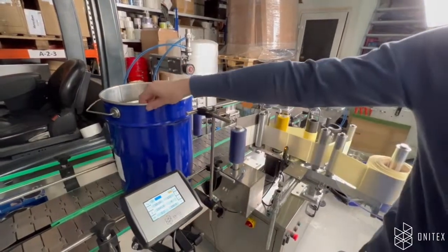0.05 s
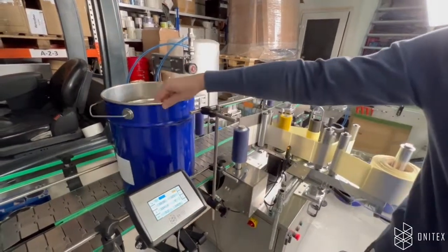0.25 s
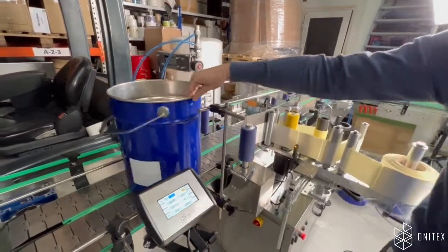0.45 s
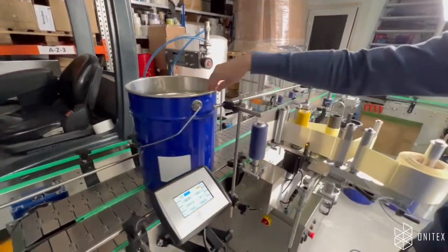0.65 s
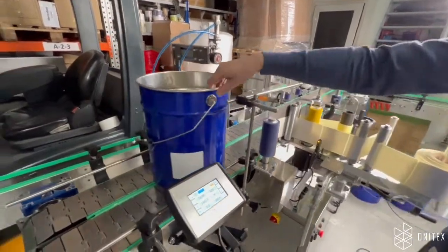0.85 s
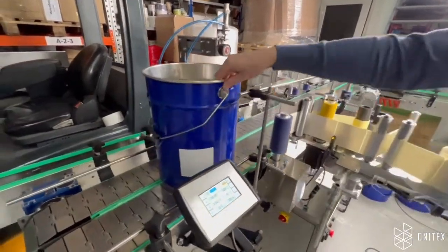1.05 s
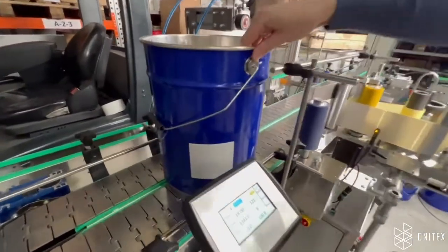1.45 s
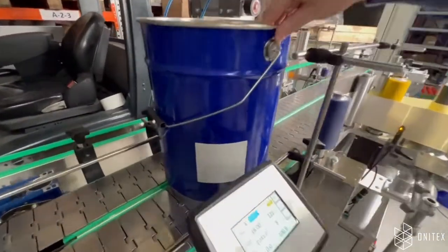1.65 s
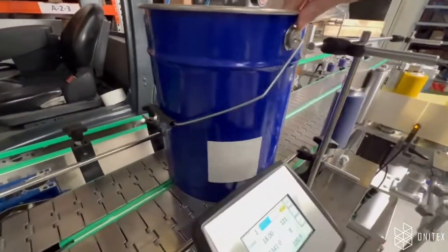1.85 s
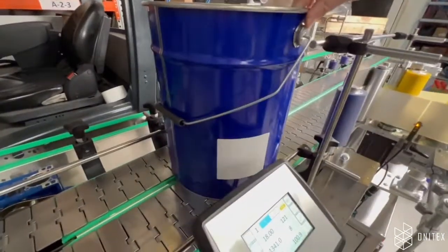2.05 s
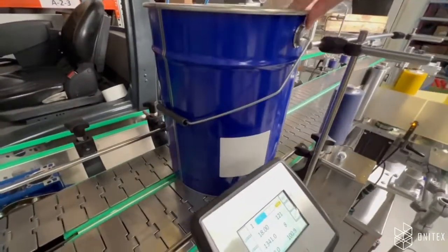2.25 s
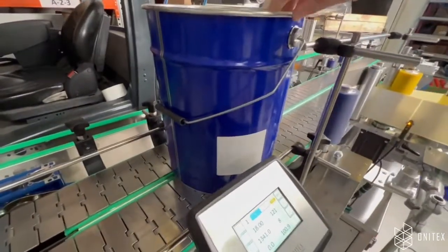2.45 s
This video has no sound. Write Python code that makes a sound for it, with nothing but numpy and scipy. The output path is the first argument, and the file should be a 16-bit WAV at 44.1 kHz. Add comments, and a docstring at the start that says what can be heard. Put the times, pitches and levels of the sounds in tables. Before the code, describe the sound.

An empty steel bucket is turned on a conveyor: its wire handle clicks, then the thin shell clangs and rattles as the base thumps down. Soft scraping and a few handle clicks follow, over a motor hum in a reverberant workshop.

```python
"""A reverberant workshop: an empty steel bucket is turned and set on a labelling machine's conveyor.
Its wire handle clicks in the lugs and drops against the wall, the base thumps down, and the thin
shell clangs and chatters. Each part is a set of decaying modes driven by impulses. Friction noise
scuffs softly as the bucket slides; a motor hums behind it."""
import sys
import numpy as np
from scipy import signal
from scipy.fft import rfft, irfft
from scipy.io import wavfile
from scipy.ndimage import uniform_filter1d

SR = 44100
rng = np.random.default_rng(int(sys.argv[2]) if len(sys.argv) > 2 else 0)


def to_wav(sig):
    """Store sig (one row per channel, or 1-D mono) as 16-bit WAV at the path in sys.argv[1].

    Samples outside -1..1 are clipped; the rate is SR.
    """
    pcm = np.clip(np.atleast_2d(sig), -1, 1) * 32767
    pcm = np.round(pcm).astype(np.int16)
    wavfile.write(sys.argv[1], SR, pcm.T)  # frames by channels


N = 110250
TIME_S = np.arange(N) / SR
FREQ_HZ = np.maximum(np.arange(N // 2 + 1) * SR / N, 1)

# wall ringing: pitch_hz, level_db, t60_s
WALL_MODES = [(209, -10, 1), (240.9, -10.5, 0.6), (763.6, -12.5, 0.44), (893, -9.5, 0.24),
              (1215, -11.5, 0.6), (1351, -6.5, 0.31), (1468, -10.5, 0.56), (1785, -13, 0.45),
              (1779, -1, 0.13), (2156, -8.5, 0.39), (4740, -7, 0.07), (3064, -7.5, 0.18),
              (3438, -9.5, 0.16), (4090, -18.5, 0.25)]
# dense shell modes: freq_hz, density_db
SHELL_SPECTRUM = [(100, -39), (230, 8), (560, -4), (850, 0.5), (1080, -7), (1400, -0.5), (2300, 0.5),
                  (3800, -5.5), (6000, -8), (9500, -10.5), (15000, -27)]
# blows on the shell: start_s, level_db, lowpass_hz, highpass_hz
SHELL_BLOWS = [(.5133, -27, 6100, 130), (.535, -35, 2920, 150), (.6285, -32, 10900, 1470),
               (.631, -21, 5170, 1680), (.638, -28.5, 4130, 477), (.661, -30.5, 1790, 583),
               (.684, -30, 4500, 597), (.745, -32, 3180, 675), (1.153, -44.5, 3100, 1280),
               (2.211, -43.5, 1780, 1300)]
# rim and handle chatter: time_s, level_db
CHATTER_ENVELOPE = [(.52, -31.5), (.56, -41), (.61, -46), (.65, -40), (.74, -39.5), (.79, -50.5),
                    (.86, -68)]
# wire and lug ringing: pitch_hz, level_db, t60_s
HANDLE_MODES = [(3235, -2, 0.12), (4790, -7.5, 0.071), (6290, -4, 0.12), (8511, -5.5, 0.095),
                (12900, -13, .05)]
# handle contact noise: freq_hz, density_db
LUG_SPECTRUM = [(300, -18), (900, 6), (2500, -3), (4500, -4), (7000, 1.5), (10000, -3.5), (13500, -5),
                (16000, -19)]
# handle clicks: start_s, level_db, lowpass_hz, highpass_hz, wire_ring_db
HANDLE_CLICKS = [(0.34, -27.5, 17000, 3470, -20), (0.345, -28.5, 9500, 700, -14),
                 (.352, -36, 12300, 700, -20), (0.463, -33, 9100, 5550, -17),
                 (0.5135, -30, 12400, 1500, -29), (0.626, -30, 19100, 10800, -7),
                 (1.149, -48.5, 18000, 2600, -20), (2.1197, -36, 9200, 1530, -5),
                 (2.127, -43, 8100, 600, 1)]
# base ringing: pitch_hz, level_db, t60_s
BASE_MODES = [(77, -9, 0.42), (119.3, 4, 0.14), (136.5, -8, 0.49), (203, -2, 0.49)]
# base meets conveyor: start_s, level_db
BASE_THUMPS = [(.52, -35), (0.601, -29), (.66, -32.5), (.715, -36.5)]
# hollow rolled rim: pitch_hz, level_db, t60_s
RIM_MODES = [(874, -1.5, 0.12), (1313, 2.5, 0.083), (1454, -4, 0.091), (4015, -3, 0.055)]
# knocks on the rim: start_s, level_db
RIM_KNOCKS = [(.3435, -29.5), (0.383, -37.5), (2.213, -49.5)]
# rubbed resonances: centre_hz, width_hz, level_db
RUB_RESONANCES = [(211.3, 22, 2.5), (1375, 250, 2.5)]
# rubbing during the turn: time_s, level_db
RUB_ENVELOPE = [(0, -85), (.21, -60), (.28, -46.5), (.33, -47.5), (.5, -55.5)]
# sliding hiss: freq_hz, density_db
SLIDE_SPECTRUM = [(300, -27.5), (900, 16.5), (1100, 0.5), (2200, 7.5), (4000, -1), (6300, 0.5),
                  (9500, -4.5), (14000, -13.5)]
# sliding hiss: time_s, level_db
SLIDE_ENVELOPE = [(0, -68.5), (.12, -51.5), (.29, -44.5), (.62, -39), (.85, -66.5), (1.6, -69.5),
                  (1.75, -57.5), (1.87, -50), (2.03, -58.5), (2.19, -50), (2.3, -101)]
# base scraping: freq_hz, density_db
SCRAPE_SPECTRUM = [(700, -28), (1750, -2), (4000, -42)]
# base scraping: time_s, level_db
SCRAPE_ENVELOPE = [(.9, -55), (1.22, -52), (1.65, -61.5)]
# bucket stereo width: freq_hz, side_to_mid_db
METAL_WIDTH = [(120, -22), (350, -0.5), (1300, 3.5), (4000, -2), (9000, 1), (13000, -5.5)]
# motor shaft harmonics 1-5: rms_db
MOTOR_HARMONICS_DB = [-89, -49, -51, -56, -74]
# machine tones: pitch_hz, rms_db
MACHINE_TONES = [(208, -57.5), (410, -60.5), (694, -64)]
# air and machinery noise: freq_hz, density_db
SHOP_SPECTRUM = [(22, -37), (38, 1), (70, 0.5), (130, -0.5), (230, -7), (850, -15.5), (1900, -21),
                 (2800, -29.5), (4200, -37.5), (6500, -37.5), (9500, -50), (15000, -69)]
# workshop stereo width: freq_hz, side_to_mid_db
SHOP_WIDTH = [(40, -7.5), (140, -9), (300, -1.5), (1000, 1)]
# microphone port dips: centre_hz, half_width_hz, gain_db
PORT_NOTCHES = [(5440, 79, -7.5), (7650, 217, -20.5), (10920, 697, -23.5)]


def shell():
    """Blows and quick rebounds ring the thin steel shell."""
    crack_db, crack_s, wall_db = 4.5, 0.01, -0.5
    rebounds_per_s, scatter_db = 140, -0.5
    body = decay(mode_cloud(SHELL_SPECTRUM, spacing_hz=8), t60_s=0.44, damping=0.083)
    body += undb(crack_db) * noise(SHELL_SPECTRUM, METAL_WIDTH) * np.exp(-TIME_S / crack_s)
    body += undb(wall_db) * ring(WALL_MODES)
    hits = rng.random(N) < rebounds_per_s / SR
    rebounds = hits * undb(scatter_db * rng.standard_normal(N)) * envelope(CHATTER_ENVELOPE)
    force = strikes(SHELL_BLOWS) + contact(rebounds, lowpass_hz=3800, highpass_hz=550)
    return drive(force, body)


def handle():
    """The wire handle clicks in its lugs and pings when it hangs free."""
    lugs = decay(mode_cloud(LUG_SPECTRUM, spacing_hz=54.74), t60_s=0.16, damping=0.027)
    clicks = strikes(row[:4] for row in HANDLE_CLICKS)
    pings = sum(tap(s, db + ring_db) for s, db, _, _, ring_db in HANDLE_CLICKS)
    return drive(clicks, lugs) + drive(pings, ring(HANDLE_MODES))


def base():
    """The flat base booms as it rocks onto the conveyor."""
    thumps = sum(tap(s, db) for s, db in BASE_THUMPS)
    return drive(thumps, ring(BASE_MODES, spread=0) * onset(rise_s=0.0022))


def rim():
    """Knocks ring the rim; rubbing makes it rasp and the wall groan."""
    rub = 0
    for hz, width_hz, db in RUB_RESONANCES:
        peak = 1 / (1 + (2 * (FREQ_HZ - hz) / width_hz) ** 2)
        rub += undb(db) * unit_rms(shape(rng.standard_normal((2, N)), peak))
    knocks = sum(tap(s, db) for s, db in RIM_KNOCKS)
    return drive(knocks, ring(RIM_MODES)) + rub * envelope(RUB_ENVELOPE)


def slide():
    """Smooth friction hisses softly; the base scrapes on the conveyor."""
    hiss = noise(SLIDE_SPECTRUM, METAL_WIDTH) * envelope(SLIDE_ENVELOPE)
    scrape = noise(SCRAPE_SPECTRUM, METAL_WIDTH) * envelope(SCRAPE_ENVELOPE)
    return hiss + scrape


def reverb(x):
    """Diffuse workshop reflections; treble dies first."""
    tail = decay(rng.standard_normal((2, N)), t60_s=1.51, damping=0.59) * onset(rise_s=0.0054)
    return drive(x, unit_rms(tail) / np.sqrt(N))


def workshop():
    """A throbbing motor and thin machine tones over a steady rush of air."""
    waver_db, rush_db = 2, -44.5
    shaft_rad = wandering_phase(pitch_hz=36.14, wander_hz=1.18, rate_hz=14)
    tones = [(k * shaft_rad, db) for k, db in enumerate(MOTOR_HARMONICS_DB, 1)]
    tones += [(wandering_phase(hz, wander_hz=1.1, rate_hz=11.95), db) for hz, db in MACHINE_TONES]
    hum = sum(undb(db + waver_db * drift(rate_hz=12.26)) * np.sqrt(2) * np.cos(rad) for rad, db in tones)
    return hum + undb(rush_db) * noise(SHOP_SPECTRUM, SHOP_WIDTH)


def tap(start_s, level_db):
    """One impulse."""
    return undb(level_db) * signal.unit_impulse(N, int(start_s * SR))


def contact(force, lowpass_hz, highpass_hz):
    """Soft contacts lose treble, light ones lose bass."""
    for hz, kind in ((lowpass_hz, "low"), (highpass_hz, "high")):
        force = signal.sosfilt(signal.butter(2, hz, kind, fs=SR, output="sos"), force + 1e-18)
    return force


def strikes(rows):
    """Summed force of filtered impulses."""
    return sum(contact(tap(s, db), *cutoffs_hz) for s, db, *cutoffs_hz in rows)


def drive(force, response):
    """Sound of an excited body or room."""
    return signal.fftconvolve(np.atleast_2d(force), response, axes=1)[:, :N]


def ring(modes, spread=1):
    """Decaying modes; spread puts the higher ones out of phase between the ears."""
    signs = rng.choice([-1, 1], (len(modes), 1, 1))
    offsets_rad = spread * signs * np.array([[1], [-1]]) * np.pi / 4
    total = 0
    for (hz, db, t60_s), offset_rad in zip(modes, offsets_rad):
        phase_rad = 2 * np.pi * hz * TIME_S + offset_rad * np.tanh(hz / 500)
        total += undb(db - 60 * TIME_S / t60_s) * np.sin(phase_rad)
    return total


def mode_cloud(spectrum, spacing_hz):
    """Steady partials at random pitches, spacing_hz apart on average."""
    present = rng.random(len(FREQ_HZ)) < SR / N / spacing_hz
    return stereo(*shape(rng.standard_normal((2, N)), present), spectrum, METAL_WIDTH)


def decay(x, t60_s, damping):
    """Octave-band decay: t60_s up to 1 kHz, divided by 2**damping per octave above."""
    octave = np.clip(np.log2(FREQ_HZ / 1000), 0, 4)
    total = 0
    for k in range(5):
        band = shape(x, np.maximum(1 - abs(octave - k), 0))
        total += band * undb(-60 * TIME_S * 2 ** (k * damping) / t60_s)
    return total


def noise(spectrum, width):
    """Coloured stereo noise, rms 1."""
    return stereo(*rng.standard_normal((2, N)), spectrum, width)


def stereo(mid, side, spectrum, width):
    """Mid and side to coloured left and right, rms 1."""
    side = colour(side, width)
    return unit_rms(colour(np.array([mid + side, mid - side]), spectrum))


def colour(x, spectrum):
    """Filter by freq_hz, gain_db rows."""
    hz, db = np.array(spectrum).T
    return shape(x, undb(np.interp(np.log(FREQ_HZ), np.log(hz), db)))


def shape(x, gain):
    """Filter by one gain per frequency bin."""
    return irfft(rfft(x) * gain, N)


def envelope(rows):
    """Gain from time_s, level_db rows; silent outside them."""
    return undb(np.interp(TIME_S, *np.array(rows).T, left=-np.inf, right=-np.inf))


def onset(rise_s):
    """Exponential rise to 1."""
    return 1 - np.exp(-TIME_S / rise_s)


def wandering_phase(pitch_hz, wander_hz, rate_hz):
    """Phase in radians of a drifting tone."""
    return 2 * np.pi * np.cumsum(pitch_hz + wander_hz * drift(rate_hz)) / SR


def drift(rate_hz):
    """Smooth random motion, rms 1."""
    hold = int(SR / rate_hz)
    steps = np.repeat(rng.standard_normal(N // hold + 1), hold)
    return unit_rms(uniform_filter1d(uniform_filter1d(steps, hold), hold)[:N])


def undb(db):
    """Decibels to gain."""
    return 10 ** (np.asarray(db) / 20)


def unit_rms(x):
    """Scale to rms 1."""
    return x / np.sqrt(np.mean(x ** 2))


def scene():
    """Bucket slightly left with its reverb; dry, centred base thumps; machines behind."""
    left_db, reverb_db = 2.5, -12.5
    pan = undb(np.array([[left_db], [-left_db]]) / 2)
    metal = (shell() + handle() + rim() + slide()) * pan
    return metal + undb(reverb_db) * reverb(metal) + base() + workshop()


def record(dry):
    """Microphone ports notch the treble; a steep low-pass cuts the top."""
    top_hz = 15800
    dips_db = sum(db * np.exp(-((FREQ_HZ - hz) / half_hz) ** 2) for hz, half_hz, db in PORT_NOTCHES)
    lowpass = signal.ellip(8, 0.2, 70, top_hz, fs=SR, output="sos")
    return signal.sosfilt(lowpass, shape(dry, undb(dips_db)))


dry = scene()
out = record(dry)
to_wav(out)
```